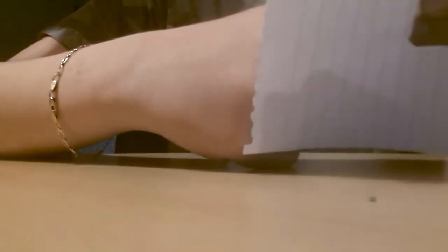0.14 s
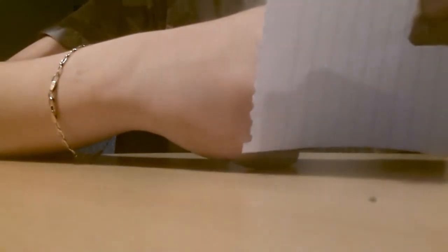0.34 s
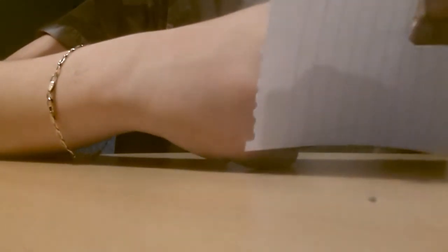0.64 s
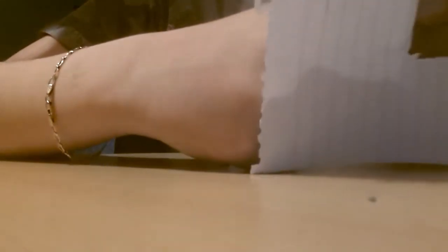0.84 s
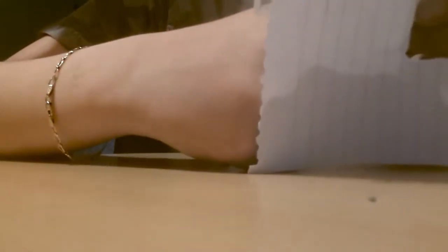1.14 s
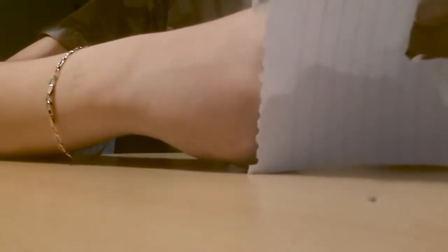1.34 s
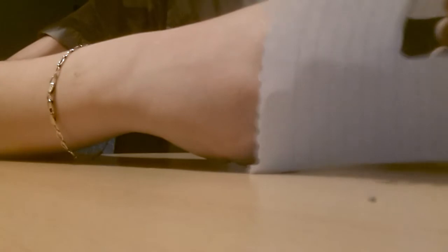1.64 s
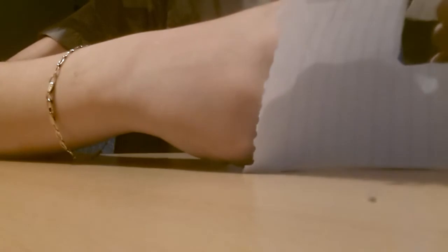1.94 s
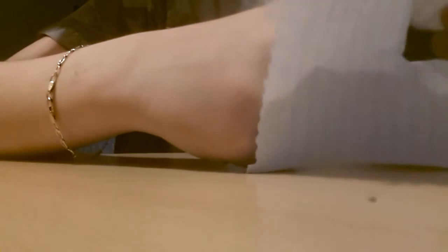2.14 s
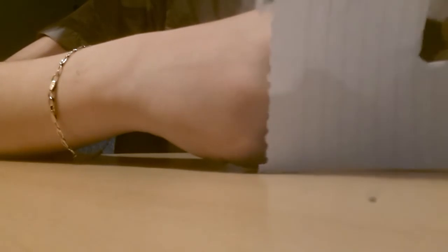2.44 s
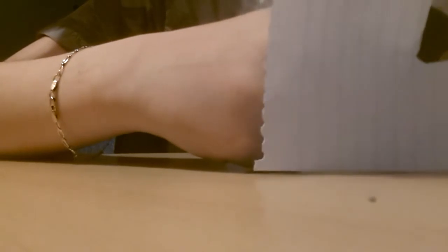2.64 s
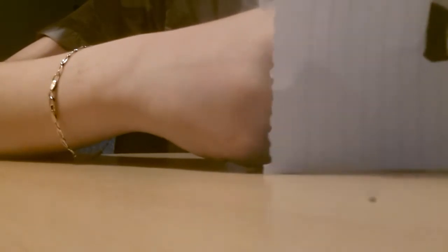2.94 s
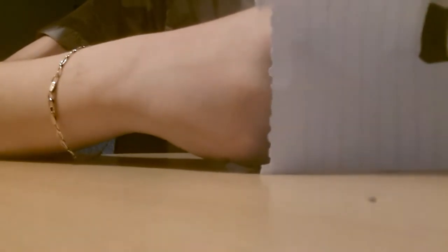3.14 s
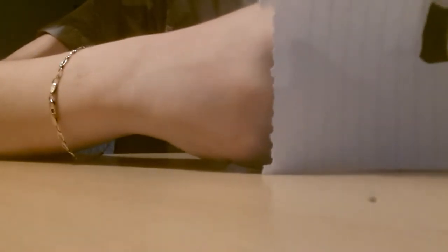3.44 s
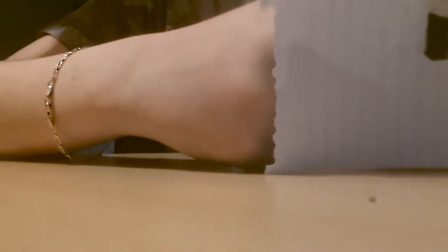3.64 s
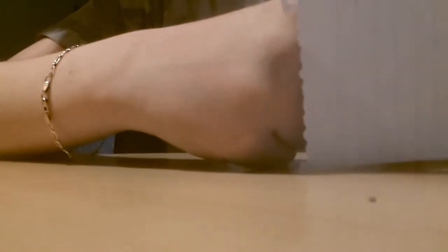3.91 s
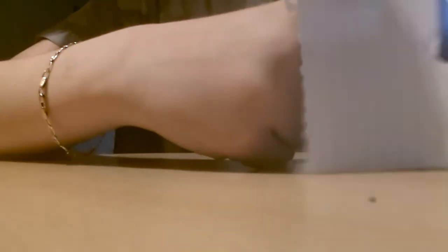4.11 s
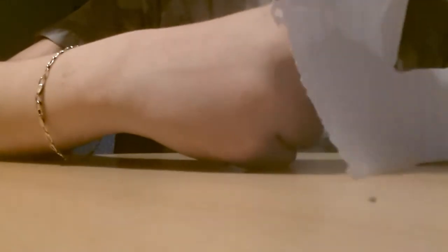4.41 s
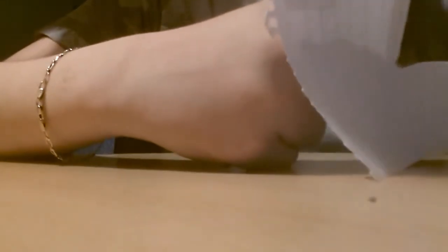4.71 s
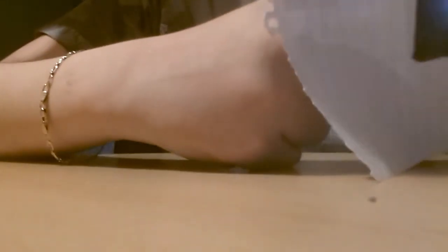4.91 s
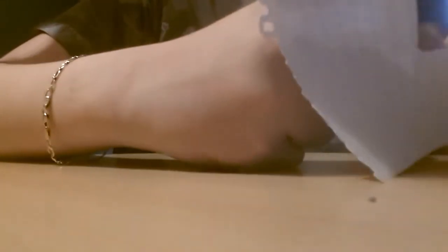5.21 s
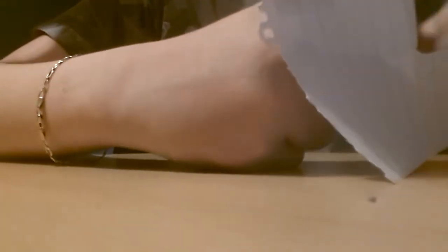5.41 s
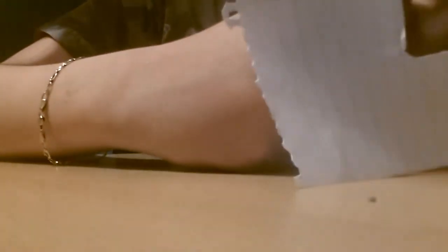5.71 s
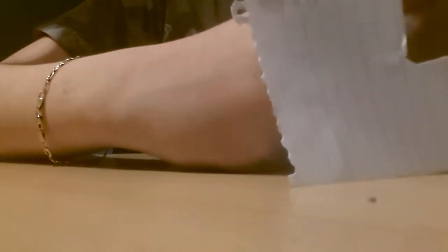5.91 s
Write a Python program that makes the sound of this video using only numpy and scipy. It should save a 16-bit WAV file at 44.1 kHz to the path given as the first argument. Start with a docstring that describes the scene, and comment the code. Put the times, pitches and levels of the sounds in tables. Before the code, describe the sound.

Scissors cut through a sheet of paper at a wooden table, close to a stereo microphone in a quiet room. Short, uneven blade strokes start at once, each a dry rasp with papery rustle, tiny tearing ticks and a very faint steel ring. Sharp snaps of snipped or buckling paper come at about 0.6 and 0.75 seconds, and a quick run of small pops near 1.75. Lighter snips and crinkles continue from 2 to 4 seconds, with the sheet's edge now and then rubbing softly on the wood. The cutting gets busier from 4 seconds and reaches its loudest snap at about 4.7. After that only soft scrapes and rustles remain until the end, just past 6 seconds. Low room tone and hiss run throughout, with a faint, thin, high whine coming and going on the left.

```python
"""A wooden table in a quiet room: scissors work through a sheet of paper, close to a stereo mic.
Sliding blades and creases shower the sheet with tiny slips that ring paper and table, scratch in the
treble and make the steel sing faintly. Fibres tick as they tear, the cut pops ahead, the sheet's edge
drags on the wood, and now and then the paper buckles with a snap and rings briefly.
Underneath lie room tone, mic hiss and a thin whine on the left."""
import sys
import numpy as np
from scipy import signal
from scipy.fft import rfft, irfft
from scipy.io import wavfile
from scipy.ndimage import uniform_filter1d

SR = 44100
rng = np.random.default_rng(int(sys.argv[2]) if len(sys.argv) > 2 else 0)


def master(y):
    """Save y as 16-bit WAV."""
    cut = np.clip(np.atleast_2d(y).T, -1, 1)
    pcm = np.round(cut * 32767)  # scale
    wavfile.write(sys.argv[1], SR, pcm.astype(np.int16))


N = 267224
TIME = np.arange(N) / SR
HIT_TIME = np.arange(int(.12 * SR)) / SR  # clock of one snap, tick or pop

# colour of room tone and mic hiss: f/Hz, relative level/dB
HISS_COLOUR = [(45, -16), (85, -17), (130, -1), (600, -1.5), (1900, -10.5), (4100, -10), (10500, -13),
               (14400, -6.5)]
# how the hiss leans in the stereo image: f/Hz, left minus right/dB
HISS_TILT = [(2000, -0.5), (8000, 1), (14500, 6)]
# spells of the whine: start t/s, end t/s, starting f/Hz
WHINE_SPELLS = [(0, .32, 11600), (.37, .96, 11580), (1.02, 1.57, 11560), (2.27, 2.9, 11610),
                (3.52, 5.43, 11620)]
# modes of the table top: f/Hz, width/Hz, level/dB
TABLE_MODES = [(162, 170, -35), (343, 320, -10.5), (450, 93, -16)]
# modes of the sheet: f/Hz, width/Hz, level/dB
SHEET_MODES = [(547, 135, 6), (669.5, 40.4, 6), (878, 133, 8), (1000.4, 91, 10.5), (1111, 107, 9),
               (1506, 92, 0), (1693, 58, -4)]
# modes of the steel blades: f/Hz, width/Hz, level/dB
BLADE_MODES = [(3220, 110, -5), (4280, 170, 6), (4726, 260, 16)]
# blades pressed together, singing most: start t/s, end t/s
TIGHT_SPELLS = [(0, 1.67), (3.27, 3.67)]
# colour of the blade rasp: f/Hz, left level/dB, right level/dB
RASP_COLOUR = [(875, -58, -40), (1330, -36.5, 6.5), (2050, 1.5, 2.5), (3300, 5.5, -2), (4100, 2, -17),
               (4580, -0.5, 0.5), (6460, -3.5, -17), (9900, -27, -33)]
# colour of the fibre crackle: f/Hz, left level/dB, right level/dB
CRACKLE_COLOUR = [(3300, -83, -12.5), (6360, -7.5, -3), (9080, 1, -8), (14050, -8.5, -21.5),
                  (15000, -1, -3.5)]
# the sheet's edge drags on the table: t/s, length/s, level/dB, rub f/Hz
EDGE_DRAGS = [(0.588, 0.012, -48, 297), (0.795, 0.067, -54, 110), (2.2, 0.064, -50, 517),
              (2.484, 0.047, -46.5, 500), (2.978, 0.088, -53.5, 174), (5.298, 0.033, -50.5, 316),
              (5.58, 0.071, -47.5, 297)]
# blade strokes and sheet slides: t/s, length/s, ring level/dB, rasp level/dB, crackle level/dB
CUT_STROKES = [(0.0, 0.044, -36, -44, -45.5), (.12, 0.024, -41, -49.5, -52), (.385, 0.016, -47.5, -56, -55),
               (.445, 0.037, -40.5, -49.5, -52), (.49, 0.11, -38.5, -44.5, -41),
               (.655, 0.017, -47, -53.5, -55), (.745, 0.015, -34, -46, -45),
               (.785, 0.04, -36.5, -39, -36.5), (.88, 0.079, -45.5, -52, -52.5),
               (1.035, 0.022, -55.5, -57.5, -61), (1.33, 0.061, -42.5, -48.5, -50),
               (1.478, 0.0059, -42.5, -44.5, -47), (1.524, 0.0044, -42, -45, -39),
               (1.545, 0.07, -45.5, -50.5, -45), (1.652, 0.0021, -41, -45, -42),
               (1.675, 0.029, -32, -50, -53), (1.73, 0.03, -30, -36, -43.5),
               (1.83, 0.046, -37.5, -44, -42.5), (1.97, 0.14, -55, -59, -60),
               (2.12, 0.08, -45.5, -46.5, -41.5), (2.24, 0.19, -52.5, -51, -50.5),
               (2.475, 0.062, -41.5, -47.5, -46), (2.58, 0.036, -49.5, -48, -42.5),
               (2.65, 0.1, -58.5, -65, -60), (2.78, 0.035, -50, -57, -50), (2.87, 0.046, -45.5, -49, -49.5),
               (2.955, 0.075, -42.5, -47.5, -47), (3.08, 0.015, -52, -51, -41.5),
               (3.12, 0.023, -37.5, -48, -56), (3.285, 0.088, -45, -52.5, -49),
               (3.4, 0.12, -53.5, -56, -53), (3.51, 0.053, -55, -67, -63),
               (3.528, 0.0039, -42, -45.5, -38.5), (3.6, 0.23, -50, -54, -51.5),
               (3.8, 0.11, -44, -48.5, -45.5), (3.95, 0.051, -36.5, -49.5, -48),
               (4.02, 0.24, -48, -57, -50), (4.115, 0.037, -42, -53, -58), (4.16, .11, -36.5, -41.5, -41.5),
               (4.3, 0.072, -38, -48, -49.5), (4.4, 0.04, -31, -36.5, -34.5), (4.47, 0.11, -40, -47, -41.5),
               (4.63, 0.062, -41, -48.5, -42), (4.67, 0.076, -39, -45, -39.5),
               (4.8, 0.043, -48.5, -55, -51.5), (4.88, 0.12, -54.5, -56, -56.5),
               (5.09, 0.05, -56, -60.5, -58), (5.28, 0.02, -51.5, -58.5, -66),
               (5.33, 0.048, -48, -54, -52.5), (5.42, 0.099, -52.5, -58.5, -57),
               (5.56, 0.015, -53, -54.5, -48.5), (5.6, 0.05, -45.5, -45, -43),
               (5.68, 0.083, -47.5, -50.5, -53), (5.79, 0.049, -57, -68, -78),
               (5.9, 0.071, -47.5, -52.5, -55.5), (6.02, 0.034, -45.5, -56.5, -52)]
# dry ticks of tearing fibres: t/s, level/dB
FIBRE_TICKS = [(0.1242, -34.5), (0.317, -44.5), (0.379, -43), (0.548, -26.5), (0.563, -28.5),
               (0.578, -28.5), (0.619, -32), (0.6254, -30), (0.6358, -27), (0.6407, -25), (0.662, -33),
               (0.679, -34.5), (0.853, -31.5), (0.96, -35), (1.246, -44), (1.2576, -35), (1.286, -38),
               (1.368, -33), (1.3824, -27.5), (1.494, -25.5), (1.516, -38), (1.7216, -23.5), (2.235, -45),
               (2.62, -34.5), (2.94, -35), (2.979, -44), (3.018, -28.5), (3.3005, -31), (3.335, -27),
               (3.4206, -29), (3.547, -45), (3.5718, -32), (3.6154, -38), (3.6903, -27.5), (3.759, -38),
               (3.833, -32), (4.49, -38), (4.675, -22), (4.799, -44), (5.439, -39), (5.523, -37.5)]
# the cut jumps ahead or a crease gives: t/s, level/dB
CUT_POPS = [(0.408, -25.5), (0.742, -19), (0.754, -11.5), (1.3222, -27), (1.7354, -20), (1.7404, -25),
            (1.746, -26), (1.7519, -20), (1.7626, -16), (1.769, -24), (1.779, -21), (1.7942, -21.5)]
# snaps and snips: t/s, ring level/dB, free sheet's f/Hz, rasp level/dB, crackle level/dB
SHEET_SNAPS = [(0.389, -33, 1060, -49, -51), (0.402, -25, 656, -45, -50), (0.4368, -28, 1020, -41, -47),
               (0.4453, -32, 1090, -37, -38), (0.4921, -25, 980, -41, -58), (0.5848, -13, 1005, -33.5, -36),
               (0.7227, -44, 1180, -40.5, -41), (0.7474, -12, 570, -23, -27.5),
               (0.7504, -18, 930, -53, -39), (1.3125, -26.5, 990, -42.5, -40.5),
               (1.431, -26.5, 970, -40.5, -36), (1.4783, -23.5, 1116, -46, -34),
               (1.5533, -20, 647, -49, -62), (1.6575, -22, 610, -43, -31.5), (1.934, -29.5, 1036, -51, -57),
               (1.9347, -18, 716, -63, -63), (2.2042, -20.5, 627, -35.5, -41),
               (2.259, -30.5, 870, -51, -64), (2.481, -23, 515, -45, -61), (2.8232, -20.5, 1420, -36, -63),
               (3.1321, -21.5, 1332, -38, -54), (3.1366, -16, 1016, -41, -57),
               (3.355, -20.5, 910, -30, -35), (3.447, -38, 1150, -39, -33), (3.562, -27, 914, -42, -52),
               (3.649, -30, 505, -44, -33.5), (3.824, -23, 910, -43, -46),
               (3.9614, -28.5, 904, -39.5, -38.5), (4.048, -18.5, 884, -36.5, -42),
               (4.1151, -22, 710, -67, -63), (4.1587, -24.5, 980, -40, -53), (4.18, -16, 950, -34.5, -61),
               (4.211, -26, 990, -58, -52), (4.324, -28, 1240, -57, -61), (4.412, -19.5, 1133, -35, -43),
               (4.515, -25.5, 587, -39, -42), (4.5814, -26, 645, -63, -55),
               (4.687, -4.5, 1104, -21.5, -20.5), (4.7568, -28, 1180, -44, -37),
               (4.817, -30, 665, -50, -58), (5.7229, -30, 1070, -63, -68)]

RASP_ALIKE, CRACKLE_ALIKE = -0.59, 0.042  # left-right correlation, negative = opposed
SWELL_DB_PER_S, SAG_DB_PER_S, FADE_DB_PER_S = 649, 12.5, 367  # shape of a stroke
TICK_T60_S, POP_T60_S, CRACK_T60_S, SNAP_T60_AT_1KHZ_S = 0.0065, 0.0098, 0.028, 0.032
FOCUS_DB_PER_OCT = 12.5  # a snap's modes weaken away from its pitch


def undb(db):
    """Decibels to gain."""
    return 10 ** (np.asarray(db) / 20)


def unit(x):
    """Scale to rms 1."""
    return x / np.sqrt(np.mean(x ** 2))


def ring(x, hz, width_hz):
    """One resonance, gain 1 at its centre."""
    return signal.lfilter(*signal.iirpeak(hz, hz / width_hz, SR), x)


def steep_ring(x, hz, width_hz, widen=1):
    """A resonance with steeper skirts: rung twice, the second band widen times as wide."""
    return ring(ring(x, hz, width_hz), hz, widen * width_hz)


def decay(t60):
    """Envelope of one hit, down 60 dB after t60 seconds."""
    return np.exp(-np.log(1000) * HIT_TIME / t60)


def fading(kicks, t60):
    """Each kick dies away exponentially."""
    return signal.lfilter([1], [1, -np.exp(-np.log(1000) / (t60 * SR))], kicks)


def add_hit(track, start_s, hit):
    """Mix one hit into a track."""
    track[int(start_s * SR):][:len(hit)] += hit


def wander(rate, spread_db):
    """A gain that drifts at random, about rate times a second."""
    steps = rng.standard_normal(int(N / SR * rate) + 2)
    return undb(spread_db * np.interp(TIME * rate, np.arange(len(steps)), steps))


def eq_curves(table, size):
    """Each level column of a colour table, drawn over the FFT bins in log frequency."""
    hz, *levels = np.transpose(table)
    grid = np.log(np.maximum(np.fft.rfftfreq(size, 1 / SR), 1))
    return np.array([np.interp(grid, np.log(hz), db) for db in levels])


def stereo_noise(envelope, colour, alike):
    """Shaped noise at two mic ports, each with its own colour on one shared minimum phase."""
    size, lead = 1024, 32  # samples
    log_gain = eq_curves(colour, size) * np.log(10) / 20
    cepstrum = irfft(log_gain.mean(axis=0))
    cepstrum[1:size // 2] *= 2
    cepstrum[size // 2 + 1:] = 0
    taps = np.roll(irfft(np.exp(log_gain + 1j * rfft(cepstrum).imag)), lead, axis=1)
    taps /= np.sqrt(np.mean(np.sum(taps ** 2, axis=1)) / 2)
    left, other = rng.standard_normal((2, N))
    pair = np.array([left, alike * left + np.sqrt(1 - alike ** 2) * other])
    return signal.oaconvolve(envelope * pair, taps, axes=1)[:, lead:N + lead]


def stroke_gains(rows, builds_db):
    """A gain per level column: strokes swell, sag and fade; each makes up builds_db while it holds."""
    power = np.zeros((len(builds_db), N))
    for start, length, *levels in rows:
        near = slice(max(int((start - .2) * SR), 0), int((start + length + .4) * SR))
        t = TIME[near] - start
        before, held, after = np.minimum(t, 0), np.clip(t, 0, length), np.maximum(t - length, 0)
        shape_db = SWELL_DB_PER_S * before - SAG_DB_PER_S * held - FADE_DB_PER_S * after
        held_back_db = np.outer(builds_db, 1 - held / length)
        power[:, near] += undb(np.array(levels)[:, None] + shape_db - held_back_db) ** 2
    return np.sqrt(power)


def hiss(level_db=-53.5):
    """The bed: room tone and mic hiss, unrelated left and right."""
    colour, tilt = eq_curves(HISS_COLOUR, N)[0], eq_curves(HISS_TILT, N)[0]
    spectrum = rfft(rng.standard_normal((2, N))) * undb([colour + tilt / 2, colour - tilt / 2])
    return undb(level_db) * unit(irfft(spectrum, N))


def whine(level_db=-60, sag_hz=45):
    """A thin wavering tone, hard left, that sags a little through each spell."""
    hz = sum(np.interp(TIME, [start, end], [f, f - sag_hz]) * ((TIME >= start) & (TIME < end))
             for start, end, f in WHINE_SPELLS)
    waver = unit(uniform_filter1d(rng.standard_normal(N), int(SR / 61)))
    tone = np.sin(2 * np.pi * np.cumsum(hz + 12 * waver) / SR)
    left = (hz > 0) * undb(level_db) * (1 + .25 * waver) * tone
    return np.array([left, np.zeros(N)])


def room(x, send_db=-18.5, t60=0.096):
    """A short diffuse tail, different on each side and duller than the source."""
    t = np.arange(int(.4 * SR)) / SR
    tail = rng.standard_normal((2, len(t))) * np.exp(-np.log(1000) * t / t60) * (t > .003)
    tail /= np.sqrt(np.sum(tail ** 2, axis=1, keepdims=True))
    return undb(send_db) * signal.oaconvolve(ring(x, 1200, 12000)[None], tail, axes=1)[:, :N]


def table_top(push, ring_gain):
    """The wood answers the moving sheet; a dragging edge adds a pitched rub and the table's lowest hum."""
    wood = unit(sum(undb(db) * steep_ring(push, hz, width, 3) for hz, width, db in TABLE_MODES))
    hum = unit(steep_ring(push, hz=109.3, width_hz=17))
    sound = undb(-11) * wood * ring_gain
    for start, length, db, rub_hz in EDGE_DRAGS:
        rub = unit(steep_ring(push, rub_hz, width_hz=77))
        hum_share = 0.5 * min(314 / rub_hz, 1) ** 4  # high rubs barely stir the hum
        gain = stroke_gains([(start, length, db)], builds_db=[0])[0]
        sound += gain * unit(wood + hum_share * hum + 0.62 * rub)
    return sound


def blade_song(envelope):
    """Scraped or struck steel sings faintly; each mode comes and goes as the blades turn."""
    tight = sum((TIME >= start) & (TIME < end) for start, end in TIGHT_SPELLS)
    scrape = envelope * undb(np.where(tight, -5, -10)) * rng.standard_normal((2, N))
    return sum(undb(db) * wander(12, 3) * ring(scrape, hz, width) for hz, width, db in BLADE_MODES)


def crinkle(x):
    """As the sheet bends, each treble band swells and sinks on its own."""
    bands_hz = 1500 * 2 ** np.arange(0, 3, .75)
    return x + sum((wander(40, 3) - 1) * ring(x, hz, hz / 2) for hz in bands_hz)


def slips(rate, spread_db, most_db):
    """A shower of tiny slips, rate a second, a few much larger than the rest."""
    happens = rng.random(N) < rate / SR
    return happens * undb(np.minimum(spread_db * rng.exponential(size=N), most_db))


def rustle():
    """Slips ring sheet and table, scratch over a smooth slide and shake the mic: body, treble, rumble."""
    ring_gain, rasp_gain, crackle_gain = stroke_gains(CUT_STROKES, builds_db=[0, 1.5, 1.5])
    shower = slips(rate=500, spread_db=1, most_db=15)
    push = unit(shower * rng.choice([-1, 1], N)) + .5 * rng.standard_normal(N)
    sheet = unit(sum(undb(db) * wander(20, 5.46) * steep_ring(push, hz, width, 2)
                     for hz, width, db in SHEET_MODES))
    body = sheet * ring_gain + table_top(push, ring_gain)
    rumble = undb(-51) * ring_gain * unit(ring(push, hz=50, width_hz=60))
    scratch = unit(fading(shower, t60=0.029))
    grit = unit(fading(slips(rate=200, spread_db=3, most_db=13), t60=0.0021))
    rasp_envelope = rasp_gain * unit(0.31 * grit + 0.56 * scratch + 1.35)
    crackle_envelope = crackle_gain * unit(0.5 * grit + 0.85 * scratch + 1)
    rasp = stereo_noise(rasp_envelope, RASP_COLOUR, RASP_ALIKE) + blade_song(rasp_envelope)
    crackle = stereo_noise(crackle_envelope, CRACKLE_COLOUR, CRACKLE_ALIKE)
    return body, crinkle(rasp + crackle), rumble


def ticks():
    """Tearing fibres tick and flick the sheet's modes: body, rasp envelope, crackle envelope."""
    kicks, crackle = np.zeros((2, N))
    for start, db in FIBRE_TICKS:
        add_hit(crackle, start, undb(db) * decay(TICK_T60_S))
        kicks[int(start * SR)] = undb(db + 9.5)
    body = sum(undb(db) * ring(kicks, hz, width) for hz, width, db in SHEET_MODES)
    return np.array([body, undb(-10.5) * crackle, crackle])


def pops(hz=1077):
    """The cut jumps or a crease gives with a short dull pop: body, rasp envelope, no crackle."""
    body, rasp = np.zeros((2, N))
    envelope = decay(POP_T60_S)
    for start, db in CUT_POPS:
        add_hit(body, start, -undb(db) * envelope * np.sin(2 * np.pi * hz * HIT_TIME))
        add_hit(rasp, start, undb(db - 10) * envelope)
    return np.array([body, rasp, np.zeros(N)])


def snaps():
    """A buckle cracks and kicks the modes near the sheet's pitch: body, rasp and crackle envelopes."""
    mode_hz, _, mode_db = np.transpose(SHEET_MODES + TABLE_MODES)
    attack = 1 - np.exp(-HIT_TIME / .0005)
    crack = decay(CRACK_T60_S)
    burst = undb(-6) * decay(TICK_T60_S) + crack + 0.28 * decay(0.074)  # bite, crack, tail
    body, rasp, crackle = np.zeros((3, N))
    for start, db, pitch, rasp_db, crackle_db in SHEET_SNAPS:
        # each grip bends the sheet differently; the nearest mode moves onto the pitch
        detune, emphasis = rng.standard_normal((2, len(mode_hz)))
        hz = mode_hz * (1 + 0.075 * detune)
        hz[np.argmin(abs(hz - pitch))] = pitch
        gains = undb(mode_db + 5.4 * emphasis - FOCUS_DB_PER_OCT * abs(np.log2(hz / pitch)))
        t60 = SNAP_T60_AT_1KHZ_S * (1000 / hz[:, None]) ** 0.65  # low modes ring longer
        modes = np.sin(2 * np.pi * hz[:, None] * HIT_TIME) * decay(t60)
        blow = (gains @ modes) * (1 + crack) * attack
        add_hit(body, start, undb(db) * blow / abs(blow).max())
        add_hit(rasp, start, undb(rasp_db) * burst)
        add_hit(crackle, start, undb(crackle_db) * burst)
    return np.array([body, rasp, crackle])


def paper_hits():
    """Snaps, ticks and pops as body and treble; a snapping sheet moves too little air for bass."""
    body, rasp_envelope, crackle_envelope = snaps() + ticks() + pops()
    body = signal.sosfilt(signal.butter(2, 380, "high", fs=SR, output="sos"), body)
    rasp = stereo_noise(rasp_envelope, RASP_COLOUR, RASP_ALIKE)
    steel = blade_song(rasp_envelope + 0.18 * crackle_envelope)
    crackle = stereo_noise(crackle_envelope, CRACKLE_COLOUR, CRACKLE_ALIKE)
    return body, rasp + steel + crackle


def scene():
    """Rustle and hits up close, over a touch of room, the hiss and the whine."""
    rustle_body, rustle_treble, rumble = rustle()
    hit_body, hit_treble = paper_hits()
    # the thin sheet gives no deep bass; the mic's case shades each port from the top of its ring
    shades = [signal.butter(3, [120, top_hz], "band", fs=SR, output="sos") for top_hz in (1400, 2200)]
    left, right = (signal.sosfilt(shade, rustle_body + hit_body) for shade in shades)
    right = np.roll(right, 8)  # the right port is further from the sheet
    body = np.array([undb(-.6) * left, undb(.6) * right])
    close = body + rustle_treble + hit_treble + rumble
    return close + room(close[1]) + hiss() + whine()


def record(dry):
    """Two steep low-passes take off the very top."""
    dry = signal.sosfilt(signal.ellip(8, .3, 40, 14520, fs=SR, output="sos"), dry)
    return signal.sosfilt(signal.ellip(10, .2, 70, 15945, fs=SR, output="sos"), dry)


dry = scene()
out = record(dry)
master(out)
```